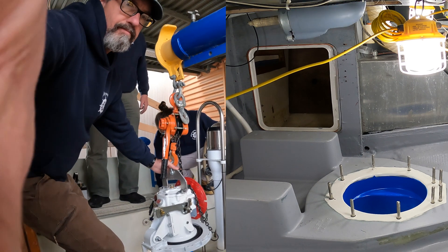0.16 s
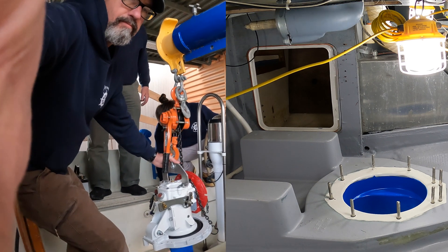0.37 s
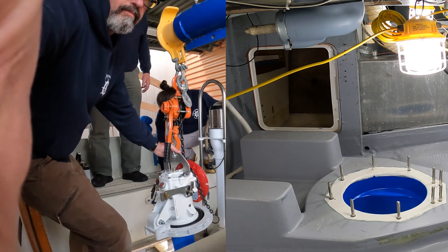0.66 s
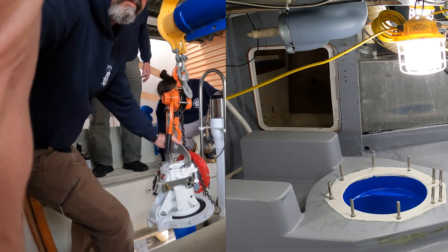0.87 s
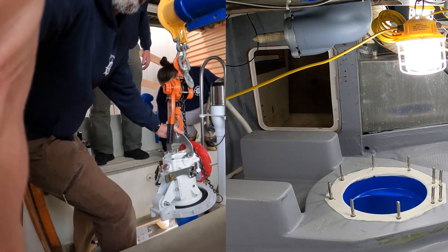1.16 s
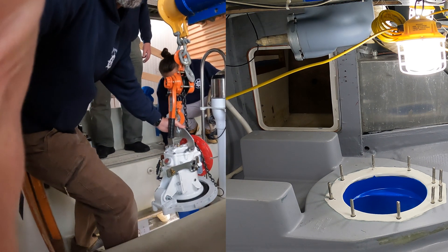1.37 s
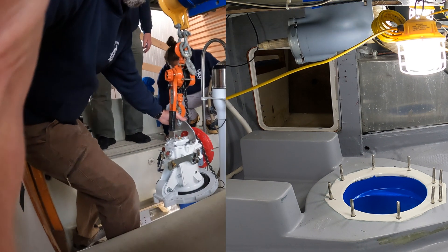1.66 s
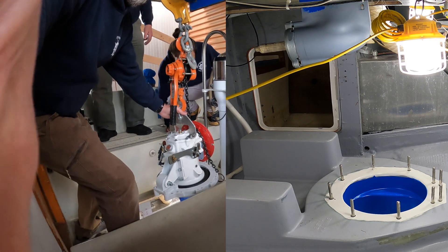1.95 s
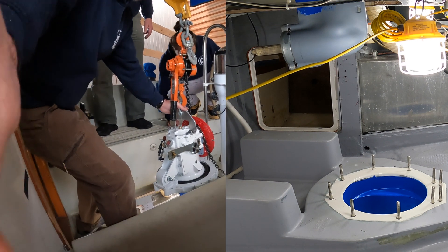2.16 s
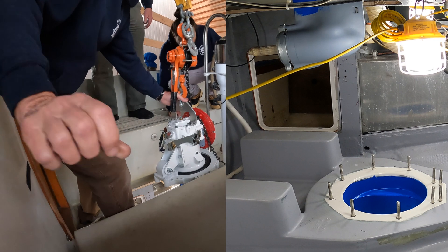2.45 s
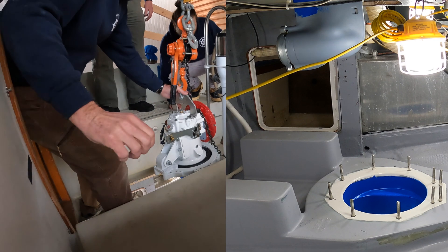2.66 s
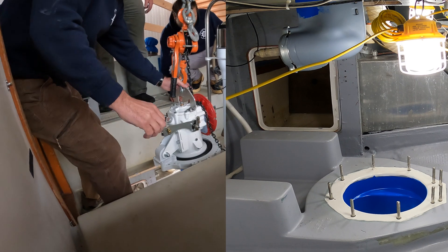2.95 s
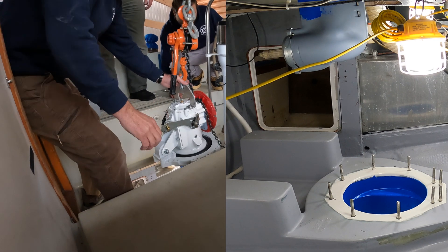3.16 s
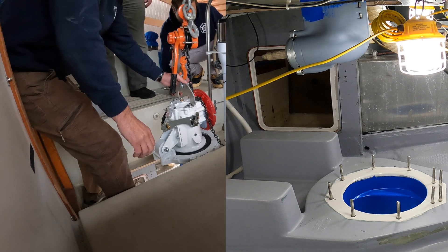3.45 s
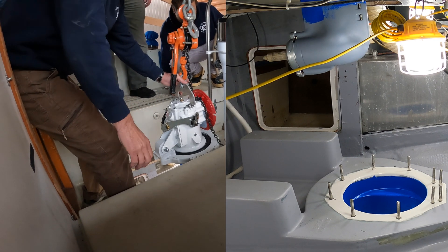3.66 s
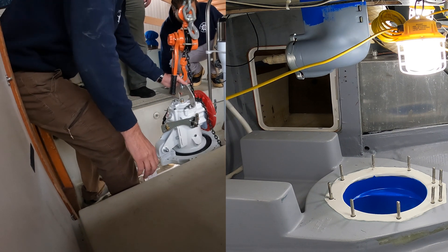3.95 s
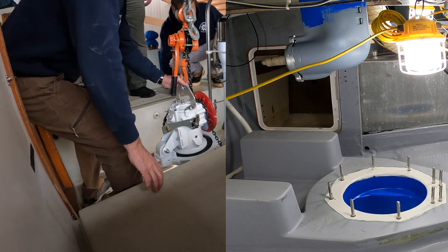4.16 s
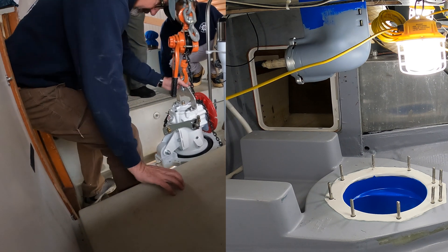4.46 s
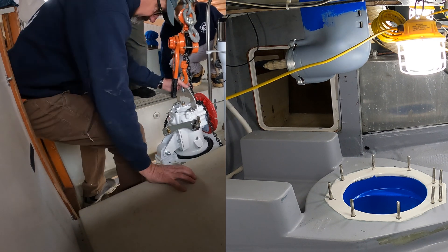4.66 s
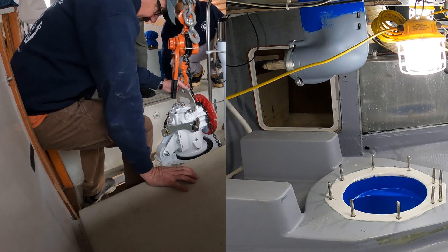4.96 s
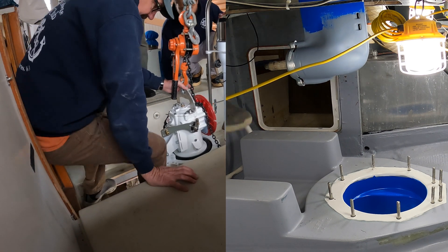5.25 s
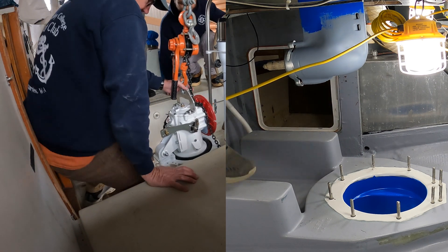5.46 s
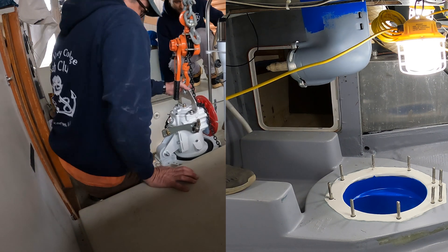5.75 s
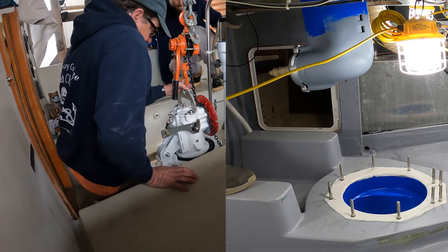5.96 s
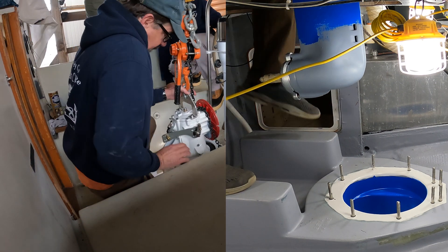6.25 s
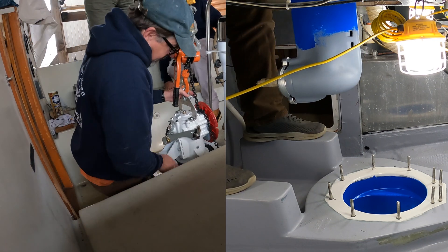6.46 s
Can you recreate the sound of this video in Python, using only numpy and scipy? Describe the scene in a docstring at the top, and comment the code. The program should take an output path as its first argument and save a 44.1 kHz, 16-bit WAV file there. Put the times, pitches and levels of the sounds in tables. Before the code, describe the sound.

An engine idles in a boat shed with a deep, gently hunting throb and low hum, while early handling clicks and a squeak knock the microphone.

```python
"""Forklift idling in a boat shed

The exhaust is harmonics of a firing rate that a governor hunts up and down; pump tones ring body panels,
covers buzz near certain speeds, fan and intake are shaped noise, and a thin 4.3 kHz tone fades early.
A hand settles the small camera: low rumble, a squeaking and scraping finger, ticks that ring the case.
Soft noise bursts are clothes and hands. Below 11 kHz the stereo narrows to almost mono, bass first."""
import sys
import numpy as np
from scipy import signal
from scipy.fft import rfft, irfft, next_fast_len
from scipy.io import wavfile
from scipy.ndimage import uniform_filter1d, map_coordinates

SR = 44100
rng = np.random.default_rng(int(sys.argv[2]) if len(sys.argv) > 2 else 0)


def transcribe(u):
    """Save the signal u as a 16-bit wav file named by the first command-line argument.

    u: samples, shape (n,) or (channels, n), limited to [-1, 1]; the rate is SR.
    q: integer samples, one column per channel.
    """
    v = np.clip(np.atleast_2d(u).T, -1, 1)
    q = np.round(v * 32767).astype(np.int16)
    wavfile.write(sys.argv[1], SR, q)


N = 291755
T = np.arange(N) / SR  # s
NARROW_HZ = 11000  # the stereo narrows only up to here

# Resonances of the camera case: (centre [Hz], width [Hz], level [dB])
CASE_MODES = [(1320, 370, 5), (2600, 480, 0.5), (3040, 380, -0.5), (3830, 680, -5), (5220, 800, -3.5),
              (7260, 560, -5), (8500, 700, -10), (10400, 660, -13), (11700, 780, -11.5), (13300, 900, -18),
              (14900, 1200, -30)]


def amp(db):
    """Linear gain of a level in dB."""
    return 10 ** (np.asarray(db) / 20)


def unit(x):
    """Scale to an RMS of 1."""
    return x / np.sqrt(np.mean(x ** 2) + 1e-20)


def curves(rows):
    """One value per sample for each column after the time."""
    s, *cols = np.transpose(rows)
    return [np.interp(T, s, c) for c in cols]


def wobble(rate):
    """A smooth random curve through normally distributed knots, rate knots a second."""
    coarse = T[::16]
    knots = rng.standard_normal(int(N * rate / SR) + 4)
    return np.interp(T, coarse, map_coordinates(knots, [coarse * rate]))


def filtered(x, response):
    """Multiply the spectrum of x by a complex response of frequency; the padding holds the tail."""
    length = x.shape[-1]
    m = next_fast_len(length + min(length, SR // 2))
    return irfft(rfft(x, m) * response(np.fft.rfftfreq(m, 1 / SR)), m)[..., :length]


def colour(points):
    """Gain of (Hz, dB) points joined on a log axis."""
    f, db = np.transpose(points)
    return lambda hz: amp(np.interp(np.log(hz + 1), np.log(f + 1), db))


def modes(table):
    """Causal resonances of (Hz, width Hz, dB); neighbours alternate in sign."""
    def response(f):
        total = 0
        for k, (centre, width, db) in enumerate(table):
            damping = 1j * f * width
            total = total + (-1) ** k * amp(db) * damping / (centre * centre - f * f + damping)
        return total
    return response


def band(hz, spread):
    """A bell-shaped band on a log axis."""
    return lambda f: np.exp(-.5 * (np.log((f + 1) / hz) / spread) ** 2)


def noise(response, channels=2):
    """Filtered white noise with an RMS of 1, independent in each channel."""
    return unit(filtered(rng.standard_normal((channels, N)), response))


def puff(length, db, hz, spread):
    """Noise in a band around hz."""
    return amp(db) * unit(filtered(rng.standard_normal(length), band(hz, spread)))


def patchy(x, depth_db, size, bins, frames):
    """Random gain patches, bins tall and frames long."""
    z = signal.stft(x, nperseg=size)[2]
    field = rng.standard_normal(z.shape[1:])
    field = uniform_filter1d(field, size=bins, axis=0)
    field = uniform_filter1d(field, size=frames, axis=1)
    return signal.istft(z * amp(depth_db * unit(field)), nperseg=size)[1][:, :N]


def speed():
    """Firings per second: the governor's hunting with a small tremor."""
    # The governor's hunting: (time [s], firing rate [firings/s])
    hunting = [(0, 24.6), (.3, 25.15), (.55, 24.62), (.9, 24.92), (1.1, 24.88), (1.45, 24.9), (1.8, 25.22),
               (2.05, 24.82), (2.35, 24.2), (2.55, 24.38), (2.75, 24.28), (3.05, 24.82), (3.25, 25.1),
               (3.43, 25.5), (3.9, 24.78), (4.1, 24.76), (4.4, 24.24), (4.65, 24.62), (4.83, 24.32),
               (5.15, 24.92), (5.48, 25.72), (5.8, 25.35), (6.08, 25.28), (6.38, 24.62), (6.52, 24.05),
               (6.62, 24.0)]
    return curves(hunting)[0] + .02 * wobble(5)


def exhaust(rate, cycles, uneven_db=1.27, surge_db=.5, skew=0.86, spread=0.083):
    """Harmonics of a skewed firing pulse, shaken by uneven firings; phase growing as k squared spreads it."""
    # Harmonics through pipe and shed resonances:
    # (multiple of the firing rate, level [dB], level gained per added firing a second [dB])
    harmonics = [(1, -28.5, 2.5), (2, -27, 2), (3, -34.5, -10), (5, -42, 0), (6, -47, 5), (7, -68.5, 1)]
    # Fourth multiple booming in the shed: (time [s], level [dB])
    boom = [(0.0, -23.5), (0.02, -28), (0.37, -23.5), (0.75, -30.5), (0.96, -24), (1.08, -30), (1.14, -25),
            (1.9, -22.5), (2.3, -29), (3.59, -22), (3.91, -25), (3.96, -29), (4.04, -23.5), (4.31, -29.5),
            (4.77, -25), (4.81, -29), (5.36, -23), (5.44, -25.5), (5.8, -20.5), (6.62, -27)]
    idle = 24.8  # mean firings/s
    excess = 0.77 * np.tanh((rate - idle) / 0.7)  # resonance flanks flatten near their tops
    shared = wobble(18)
    out = 0
    for k, db, slope_db in [*harmonics, (4, curves(boom)[0], 0)]:
        polarity = 1 if k <= 3 else -1  # the next shed mode swings the other way
        firing_phase = 2 * np.pi * cycles + 0.025 * shared
        phase = k * firing_phase + skew + spread * k * k + 0.1 * wobble(17)
        level_db = db + slope_db * excess + uneven_db * wobble(8) + surge_db * wobble(3.47)
        out = out + polarity * amp(level_db) * np.cos(phase)
    return np.sqrt(2) * out


def pump(cycles):
    """Shaft tones pulsed by each firing ring panel modes, so hunting moves them across the resonances."""
    # Tones driving the panels, the engine's own eighth among them:
    # (multiple of the firing rate, level before the panels [dB])
    shaft = [(7.42, -50), (8, -36), (8.47, -38), (14.85, -37), (18.05, -55), (22.5, -47)]
    # Body panel resonances: (centre [Hz], width [Hz], level [dB])
    panel_modes = [(206.2, 6.5, 1), (361.1, 7, -1.5), (376.3, 7, -12), (450, 30, -4), (577, 14.7, -2.5)]
    # Panel loudness: (time [s], lowest panel's gain [dB], gain of the others [dB])
    loudness = [(0, -15, -1), (.5, 4, 5), (1.5, -1.5, 2), (2.3, 4, 4.5), (3.05, 5.5, 5), (3.3, 1, 2),
                (3.9, 3.5, 3), (4.3, 5, 5.5), (5.0, 4, 3.5), (5.4, 2, 5.5), (6.2, 2.5, 0.5), (6.62, 4, 6)]
    tones = 0
    for k, db in shaft:
        phase = 2 * np.pi * k * cycles + 0.27 * wobble(25)
        tones = tones + amp(db + 2.26 * wobble(6)) * np.sin(phase)
    firing = np.cos(2 * np.pi * cycles)
    pulsed = tones * (1 + 0.51 * firing)
    # Split at 280 Hz: the lowest panel has its own loudness
    panels = filtered(pulsed, lambda hz: modes(panel_modes)(hz) * np.array([hz < 280, hz >= 280]))
    ringing = (amp(curves(loudness)) * panels).sum(axis=0)
    return ringing * (1 + 0.21 * firing)  # the rocking engine also damps the panels once a firing


def covers(rate):
    """Narrow buzzes, each swelling when the hunting speed comes near its own."""
    # Buzzing covers: (centre [Hz], width [Hz], level at best speed [dB], best speed [firings/s])
    buzzes = [(1216, 40, -60, 24.3), (1322, 50, -57, 25.1), (1616, 67, -59.5, 24.3), (1685, 50, -60, 24.8),
              (1758, 46, -61, 25.4)]
    reach = 0.43  # firings/s, standard deviation of the bell around the best speed
    out = 0
    for hz, width_hz, db, best in buzzes:
        near = np.exp(-.5 * ((rate - best) / reach) ** 2)
        buzz = noise(lambda f: modes([(hz, width_hz, 0)])(f) ** 2, channels=1)[0]
        out = out + amp(db + 1.3 * wobble(4)) * near * buzz
    return out


def roar(db=-37, patchy_db=0.19, fine_patchy_db=1.26):
    """Slightly uneven fan and intake noise, lifted in bands by the engine bay; two unrelated copies."""
    # Fan and intake spectrum: (frequency [Hz], relative level per Hz [dB])
    spectrum = [(8, -13.5), (35, -11), (65, -4), (88, -4), (115, -6), (153, -10.5), (209, -8.5), (274, -16),
                (500, -19), (940, -22.5), (1060, -26.5), (1730, -26.5), (4300, -36.5), (4650, -40.5),
                (7000, -45), (8700, -53), (11600, -62), (13500, -71.5), (15600, -100.5)]
    # Bands the engine bay lifts: (centre [Hz], width [Hz], lift [dB])
    bay_lifts = [(359.6, 91, 6.5), (453, 34, 1), (546, 21, 1.5), (753, 66, 2), (869, 23, 2.5), (924, 30, 5),
                 (1275, 100, 2.5), (1715, 200, 1.5), (2085, 150, 2), (3420, 180, 2), (5730, 490, 3.5),
                 (10780, 1000, 6)]
    # Drifting level: (time [s], gain below 1 kHz [dB], gain above [dB])
    drift = [(0, 4, 2.5), (.6, 0, 1.5), (2.4, 0, 0), (2.8, 2, 2), (4, -.5, 1), (4.4, 3.5, 3), (6.1, 1, .5),
             (6.62, 2, 1.5)]

    def bay(hz):
        lift = sum(lift_db / (1 + (2 * (hz - c) / w) ** 2) for c, w, lift_db in bay_lifts)
        return colour(spectrum)(hz) * amp(lift)

    air = patchy(rng.standard_normal((2, N)), patchy_db, size=512, bins=6, frames=8)
    air = patchy(air, fine_patchy_db, size=4096, bins=3, frames=10)
    air = amp(db) * unit(filtered(air, bay))
    low = filtered(air, lambda hz: 1 / (1 + (hz / 1000) ** 4))
    low_db, high_db = curves(drift)
    return amp(low_db) * low + amp(high_db) * (air - low)


def whine():
    """A thin, nearly steady sine that fades, then drops faster after 1.7 s."""
    fade_db = 13.5 * T + 51 * np.maximum(T - 1.7, 0)
    level_db = -58.5 - fade_db + 2.5 * wobble(30)
    return amp(level_db) * np.sin(2 * np.pi * 4312 * T + .9 * wobble(37))


def swell(s, hold, db, rise, fall):
    """Gain that rises to db at s, holds, and falls; rise and fall are seconds for 20 dB."""
    before = np.maximum(s - T, 0)
    after = np.maximum(T - s - hold, 0)
    return amp(db - 20 * before / rise - 20 * after / fall)


def grip():
    """The hand shakes the case: rumble, then a finger's squeak, groan and scrape; middle and side."""
    # The hand jolts the case: (time [s], peak rumble level [dB])
    jolts = [(0.061, -20.5), (.65, -27), (1.22, -29), (1.38, -36), (1.5, -25.5), (2.0, -24)]
    # The finger slips on the case: (time [s], hold [s], squeak level [dB], groan level [dB])
    strokes = [(0.063, .008, -45, -60), (0.072, 0.01, -34.5, -45), (0.077, .005, -60, -29.5),
               (0.094, 0.053, -58, -45), (0.17, .004, -64, -37)]
    # Finger on the case: (frequency [Hz], relative level per Hz [dB])
    scrape_spectrum = [(1000, -0.5), (3000, -1), (5000, -2), (7500, -6.5), (9500, -14.5), (12500, -17),
                       (14000, -28), (15700, -33)]
    jolt_rise, jolt_fall = 0.077, 0.19  # s for 20 dB
    stroke_rise, stroke_fall = 0.016, 0.017  # s for 20 dB
    lift_s, sing_s = .172, .068  # the finger lifts; its singing starts

    rumble = noise(colour([(2, -28.5), (8, 3.5), (20, 9.0), (45, 0.0), (90, -8.5), (200, -39), (400, -86)]))
    # A steady hold sways by about 1 dB and lets go at 1.98 s, falling 151 dB a second
    hold = amp(-28.5 + wobble(12.44) - 151 * np.maximum(T - 1.98, 0))
    jolting = sum(swell(s, 0, db, jolt_rise, jolt_fall) for s, db in jolts)
    shake = (hold + jolting) * rumble

    squeak_gain, groan_gain = 0, 0
    for s, held, squeak_db, groan_db in strokes:
        squeak_gain = squeak_gain + swell(s, held, squeak_db, stroke_rise, stroke_fall)
        groan_gain = groan_gain + swell(s, held, groan_db, stroke_rise, stroke_fall)
    squeak_tone = np.sqrt(2) * np.sin(2 * np.pi * 908 * T + 0.29 * wobble(198))
    squeak = squeak_gain * amp(1.1 * wobble(168)) * squeak_tone
    groan = groan_gain * noise(lambda hz: modes([(700, 190, 0)])(hz) ** 2)

    drag = swell(0, lift_s, -52, 1, .03)  # steady until the finger lifts
    brush = swell(0, lift_s, -56.5, 1, 0.51)  # a lighter brush that fades slowly after the lift
    press = swell(.068, 0.035, -55.5, stroke_rise, stroke_fall)  # pressed harder once
    rubbing = noise(lambda hz: colour(scrape_spectrum)(hz) * (1 + 0.47 * abs(modes(CASE_MODES)(hz))))
    scrape = (drag + brush + press) * rubbing
    # The dragging finger sings near 7 kHz
    sing_gain = swell(sing_s, lift_s - sing_s, -57.5, stroke_rise, stroke_fall) * amp(2 * wobble(64))
    scrape = scrape + sing_gain * noise(lambda hz: modes([(6950, 300, 0)])(hz) ** 2)
    top = filtered(scrape[0] - .6 * scrape[1], lambda hz: hz > NARROW_HZ)
    scrape = scrape + np.array([[0], [1]]) * top  # its top leans to the left port

    # The case flexes in opposite sense at the two ports
    opposed = squeak * amp([[0], [5]]) + groan * amp([[0], [2.5]])
    return shake * amp([[0], [-3]]) + opposed * np.array([[1], [-1]]) + scrape * amp([[0], [-1]])


def ticks():
    """Each row is a sharp contact with a short rattle, ringing the case; close rows together make one click."""
    # Contacts before the case rings: (time [s], rattle level [dB], centre [Hz], band spread [log Hz],
    # 60 dB decay time [s], left over right [dB])
    contacts = [(.074, -39, 2600, 0.15, 0.041, -4), (.084, -37, 2900, 0.27, .04, -6),
                (.096, -35, 3300, .35, 0.032, -1), (0.168, -37.5, 3480, 0.096, 0.013, -1),
                (.170, -46, 12700, .07, .02, 13.5), (.173, -36, 1900, 0.32, 0.016, -6),
                (.301, -45, 9600, .3, .013, 3.5), (.3995, -34, 6200, 0.33, .012, 3.5),
                (0.4022, -24, 4000, 1.1, 0.0086, 12), (.4032, -32, 2900, 0.2, 0.021, 3),
                (.409, -39, 4500, .54, 0.068, 3), (.425, -48.5, 9000, .4, .06, 6.5),
                (1.966, -40, 13400, .14, 0.05, 14.5), (1.989, -43.5, 13000, 0.11, .04, 2.5),
                (2.037, -35, 8500, 0.41, 0.021, 10), (2.046, -44, 8500, .36, 0.059, 3)]
    lead = .001  # s from the start of each piece to the contact
    crack_db = 7  # contact peak over the rattle level
    rattle_rise = 0.00017  # s, time constant
    out = np.zeros((2, N + SR))  # middle and side
    t = T[:SR // 10] - lead
    after = np.maximum(t, 0)
    impulse = 1. * (np.arange(len(t)) == np.argmin(abs(t)))
    for s, db, hz, spread, t60, pan_db in contacts:
        crack = filtered(impulse, band(hz, spread))
        crack = amp(db + crack_db) * crack / crack.max()
        rattle = (1 - np.exp(-after / rattle_rise)) * puff(len(t), db - 60 * after / t60, hz, spread)
        left, right = (crack + rattle) * amp([[pan_db / 2], [-pan_db / 2]])
        start = round((s - lead) * SR)
        out[:, start:start + len(t)] += np.array([(left + right) / 2, (left - right) / 2])
    return filtered(out[:, :N], modes(CASE_MODES))


def scuffs():
    """Clothes and hands brush softly: bands of noise with a rise and a slower fall."""
    # Brushes: (time [s], length scale [s], centre [Hz], level [dB], band spread [log Hz])
    brushes = [(.615, 0.13, 111, -29, 0.2), (1.97, 0.066, 12500, -66, 0.1), (2.04, .04, 9000, -65.5, .3),
               (3.408, 0.26, 5700, -57.5, 0.26), (3.458, 0.16, 560, -44.5, 0.21),
               (4.378, 0.11, 1490, -46.5, 0.55), (4.39, 0.07, 1190, -42, 0.078),
               (5.618, 0.18, 650, -44, 0.37)]
    out = np.zeros(N + 2 * SR)
    for s, length, hz, db, spread in brushes:
        u = T[:round(3 * length * SR)] / length
        envelope = 4 * u * np.exp(1 - 4 * u)  # peaks at a quarter of the length scale
        start = round(s * SR)
        out[start:start + len(u)] += puff(len(u), db, hz, spread) * envelope
    return out[:N]


def scene():
    """Engine in the middle; fan, hand and ticks also reach the side."""
    rate = speed()
    cycles = np.cumsum(rate) / SR
    mid, side = roar() * amp([[0], [-4]]) + grip() + ticks()
    mid = mid + exhaust(rate, cycles) + pump(cycles) + covers(rate) + whine() + scuffs()
    return np.array([mid + side, mid - side])


def record(dry):
    """Add microphone hiss, narrow the stereo below 11 kHz, bass first, and limit the band."""
    # Each microphone's own hiss: (frequency [Hz], relative level per Hz [dB])
    hiss = [(9000, -60.5), (11000, -1), (12000, -1.5), (13600, -0.5), (14300, -12), (15700, -19)]
    split_hz, top_hz = 1550, 15720
    left, right = dry + amp(-80.5) * noise(colour(hiss))
    mid, side = (left + right) / 2, (left - right) / 2

    def three_bands(hz):
        return np.array([hz < split_hz, (hz >= split_hz) & (hz <= NARROW_HZ), hz > NARROW_HZ])

    def share(fall_db):
        """Side gain that falls by fall_db in the first second, ever faster, down to a floor."""
        return amp(np.maximum(-1.5 - fall_db * T ** 1.4, -62.5))

    low, middle, high = filtered(side, three_bands)
    side = share(58) * low + share(23.5) * middle + high
    return filtered(np.array([mid + side, mid - side]), lambda hz: hz < top_hz)


dry = scene()
out = record(dry)
transcribe(out)
```